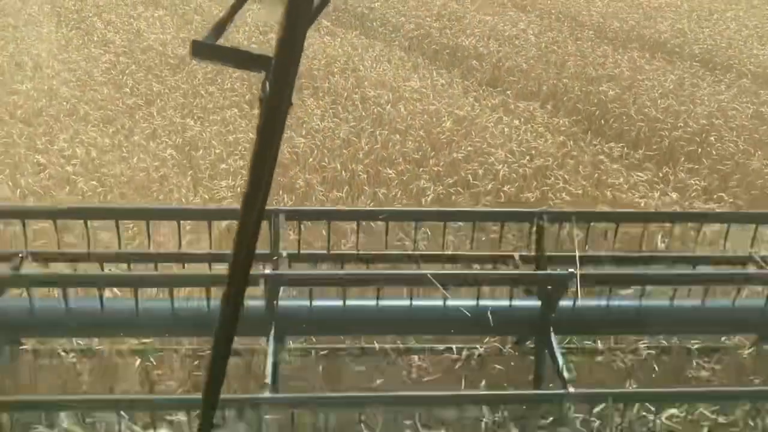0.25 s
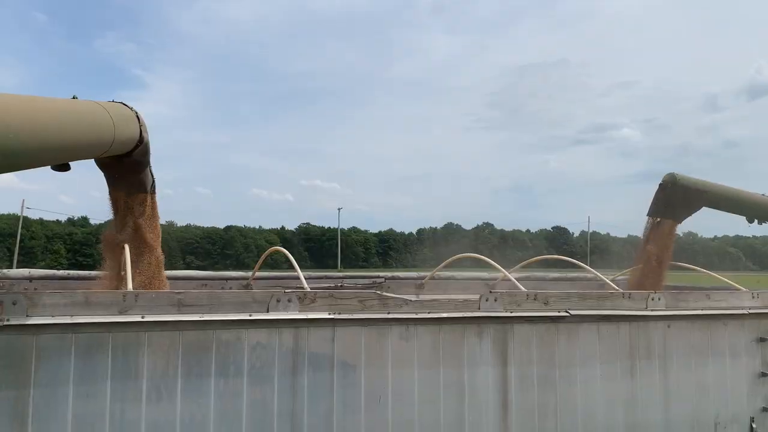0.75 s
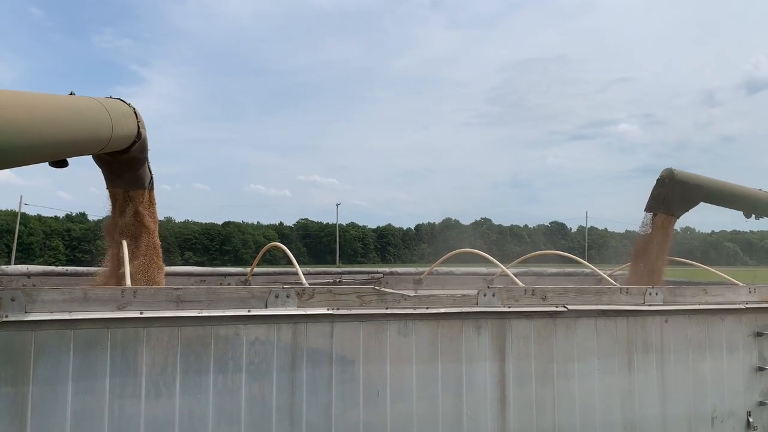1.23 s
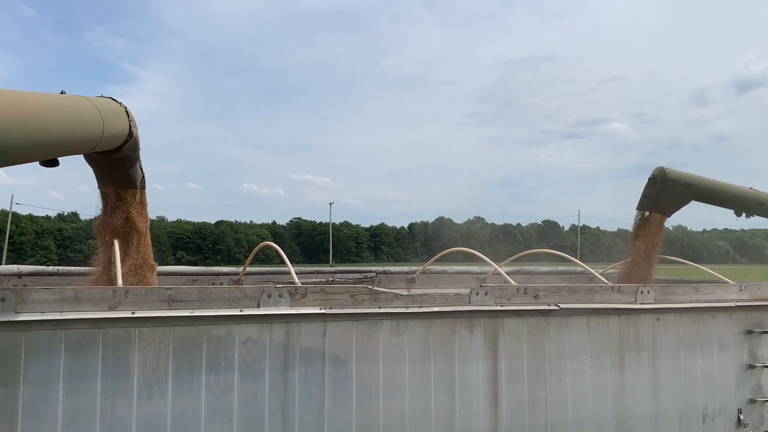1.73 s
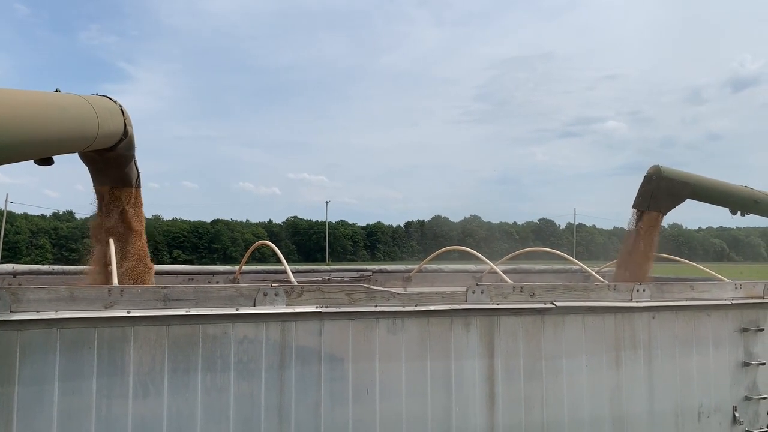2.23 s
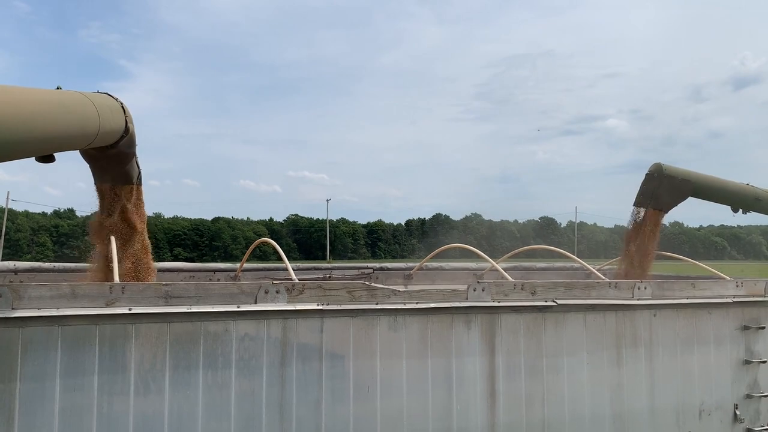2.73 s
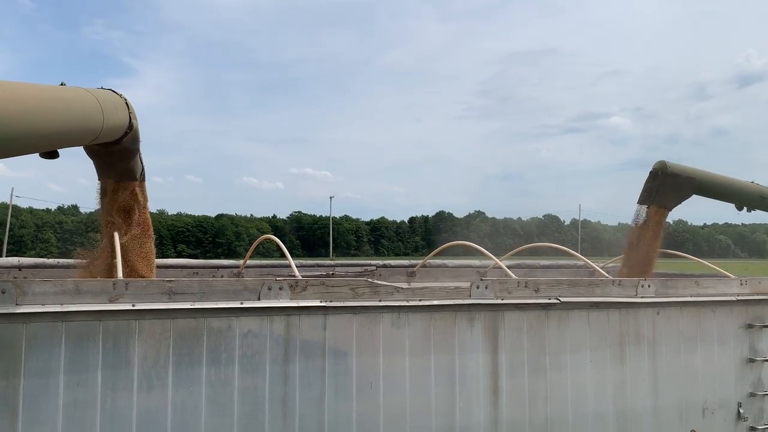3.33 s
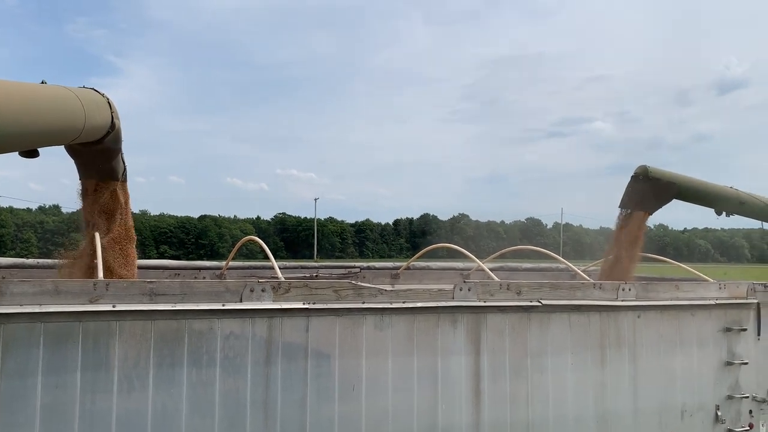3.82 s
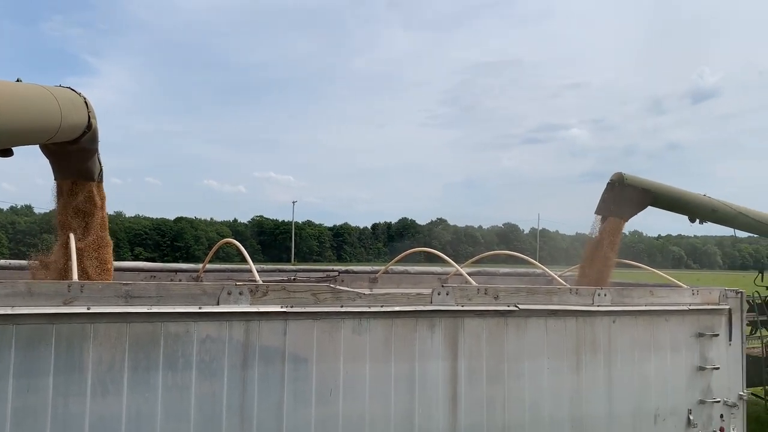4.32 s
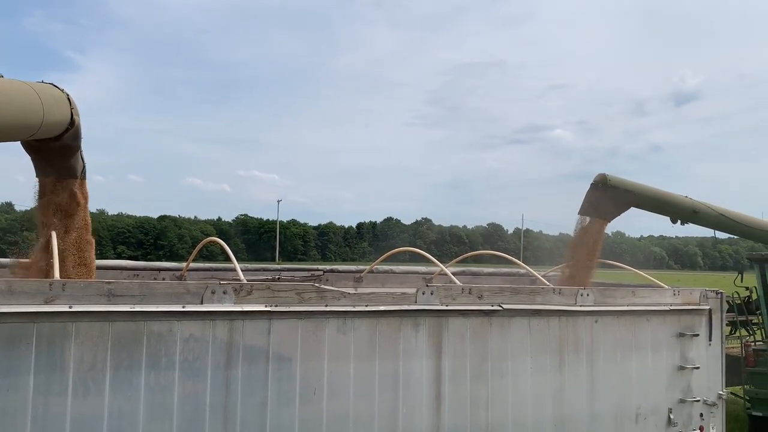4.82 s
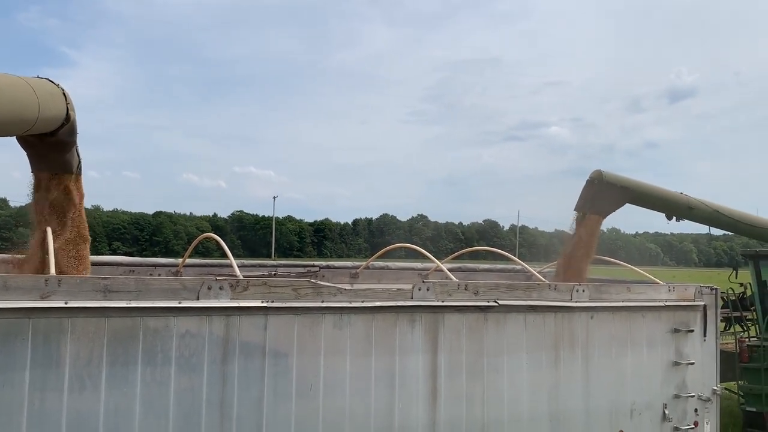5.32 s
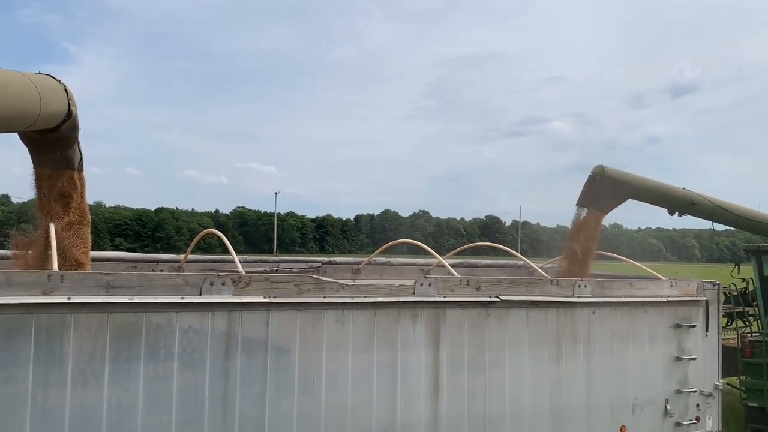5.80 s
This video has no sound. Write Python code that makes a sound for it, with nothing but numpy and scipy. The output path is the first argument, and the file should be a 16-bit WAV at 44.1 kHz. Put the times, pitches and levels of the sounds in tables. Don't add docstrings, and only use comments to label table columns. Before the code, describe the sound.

Muffled low cab rumble over ruts for half a second, then abruptly a loud whining, throbbing auger pouring hissing grain beside humming harvester engines.

```python
import sys
import numpy as np
from scipy import signal
from scipy.fft import rfft, irfft
from scipy.io import wavfile
from scipy.ndimage import map_coordinates

SR = 44100
rng = np.random.default_rng(int(sys.argv[2]) if len(sys.argv) > 2 else 0)


def waveform_to_disk(signal):
    frames = np.transpose(np.atleast_2d(signal))
    scaled = np.clip(frames, -1, 1) * 32767
    samples = np.round(scaled).astype(np.int16)
    wavfile.write(sys.argv[1], SR, samples)


def natural_amplitude(level_db):
    exponent = np.asarray(level_db, float) / 20
    return 10 ** exponent


N = 267025
TIME = np.arange(N) / SR
HZ = np.maximum(np.fft.rfftfreq(N, 1 / SR), 1)
CUT_S = 0.486
ROAR_LEAD_S, GRAIN_LEAD_S = 19.5 / SR, -13 / SR

# (frequency [Hz], density [dB per Hz])
CAB_RUMBLE = [(20, -63), (45, -42), (110, -39), (180, -49.5), (400, -57), (900, -64.5), (1500, -76.5)]
CAB_CLATTER = [(700, -6), (1200, 8.5), (2600, 8.5), (4000, -4.5), (7000, -11), (9500, -5), (11000, -6),
               (15000, -8)]
# (frequency [Hz], level [dB rms], left-right [dB])
CAB_TONES = [(113, -30.5, 4), (501, -40, -2), (509, -43, -1), (736, -41.5, 4), (858, -56, 10),
             (44, -30.5, 1), (277, -39, 2)]
# (time [s], peak [dB], frequency [Hz], 60 dB decay [s])
CAB_KNOCK = (.208, -38, 1100, .06)
# (time [s], rumble rise [dB])
JOLTS = [
    (.02, 1),
    (.06, 3.5),
    (.21, 4),
    (.31, 4.5),
    (.38, 2.5),
]
JOLT_S, CAB_RUMBLE_DB, CAB_CLATTER_DB = 0.0097, -2, -83.5

# (frequency [Hz], density [dB per Hz])
ROAR = [(22, -82), (40, -57), (62, -49.5), (105, -40), (145, -43.5), (200, -46), (310, -46), (500, -51),
        (1000, -55.5), (1600, -60.5), (2400, -63), (4000, -67), (6000, -69.5), (8000, -82)]
# (frequency [Hz], shared share [0-1])
ROAR_ALIKE = [(60, 0.85), (130, 0.93), (300, 0.64), (700, 0.32), (1000, 0.17), (1500, 0.63), (2500, 0),
              (5000, 0.51)]
# (frequency [Hz], left-right [dB])
ROAR_PAN = [(60, 3), (150, 2.5), (400, 6), (800, 2.5), (1300, 1), (3500, 1), (6000, -5)]
# (time [s], change [dB])
LOAD = [(.5, 0.2), (1.4, .2), (2.5, 0.2), (3.8, 0.35), (5.0, 0.27), (6.05, 0)]
LOW_FOLLOWS, GRAIN_FOLLOWS = 0.6, 0.7

# (frequency [Hz], level [dB rms], left-right [dB], phase wander [rad])
HUMS = [(71.3, -36, 1.6, .8), (187.05, -30.5, 1.5, .35), (240.5, -33, -3, 1.5), (305, -35, 3, 5.0),
        (559, -43, 3, 2.5), (794.7, -39, 3, .9), (930, -48, 5, 2.5), (1031.6, -45, -8, .8),
        (1082, -51, 14, .8), (1245, -49, 1, 4.0), (1284, -52, 1, 2.0)]
FIRING_HZ, FIRING_DB, FAR_FIRING_DB = 84.445, -22, -37
BEAT_HZ, BEAT_LEAD = 0.78, 0.31

# (frequency [Hz], density [dB per Hz])
GRAIN = [(3000, -77), (5500, -70), (7000, -71.5), (8400, -73.5), (9450, -72), (9750, -67), (10000, -68.5),
         (10500, -71), (11300, -69), (12500, -70), (12800, -65), (14100, -68), (14400, -72.5), (15200, -67)]
# (frequency [Hz], shared share [0-1])
GRAIN_ALIKE = [(5000, .4), (7000, .45), (8000, .9), (8400, .97), (9400, .92), (9900, .5), (10500, .2),
               (11700, .6), (15000, .3)]

# (rate [turns/s], angle at time zero [turns])
AUGERS = [(6.0444, .495), (6.49, -.027)]
# (rate [turns/s], angle at time zero [turns])
IDLERS = [(3.7, -.16), (4.16, .09)]
IDLER_DB, PRESS_CHANCE_DB = 1.3, 0.5
# (frequency [Hz], width [Hz], level [dB])
TUBE = [(1290, 65, -4), (1816, 45, -6), (1960, 33, -7.5), (2380, 17.5, -1.5), (2473, 43, -4.5),
        (2630, 54, -4), (4220, 64, -4)]
# (time [s], extra force [dB])
BINDS = [(.94, 4), (1.67, 7.5), (1.9, 4), (2.18, 11), (3.05, 3), (3.37, 4), (3.85, 7), (4.04, 7.5),
         (4.33, 4), (4.58, 8), (5.21, 6), (5.38, 3), (5.71, 1), (6.02, 3)]
BIND_S, PATCH_DB = 0.03, 2.5

TEETH = 23
GEARS = [(0, 1, .475, .33, .155, .68, .065), (0, 2, -.44, .45, .135, .5, -.05),
         (0, 3, .405, .75, .22, .7, .43), (0, 10, 0, .5, 0, 1.2, 0), (1, 1, -.154, .1, 0, .1, 0)]
# (level [dB rms], left-right [dB])
WHINE = [(-19.5, 4.5), (-24.5, 5.5), (-31, 3), (-38, 0), (-25.5, 3)]
SLACK_HZ, SLACK_RAD, SLACK_LEAD = 3.78, 0.31, 0.37

# (upper edge [Hz], then share of time heard [0-1] in
TREBLE_HEARD = [(8270, 0, 1, 1, 1), (8950, 0, 1, 0, 1), (9350, .08, .8, 1, 1), (10300, .65, .85, .85, .94),
                (10650, 1, 0, .84, .85), (11180, 1, .1, .36, .25), (11560, .1, .2, .3, .4),
                (11900, .05, .9, .25, .95), (12060, 1, .7, 1, 1), (12750, .85, 0, 1, .24),
                (13070, .97, .42, 1, 0), (13750, .95, .2, 0, 0), (14200, 1, .1, 1, 0),
                (14920, 1, 0, 1, .25), (15100, 1, .9, 1, 1), (15330, .3, .4, 0, .95), (15560, .3, 0, 0, .4),
                (SR, 0, 0, 0, 0)]


def in_time(rows):
    s, *columns = np.transpose(rows)
    return [np.interp(TIME, s, column) for column in columns]


def at_hz(points):
    hz, value = np.transpose(points)
    return np.interp(np.log(HZ), np.log(hz), value)


def drift(rate):
    knots = rng.standard_normal(400)
    return map_coordinates(knots, [TIME * rate + 2], order=3)


def bumps(rows, width_s):
    return sum(db * np.exp(-((TIME - s) / width_s) ** 2 / 2) for s, db in rows)


def at_ports(mono, pan_db, lead_s):
    half = natural_amplitude(pan_db / 2) * np.exp(1j * np.pi * HZ * lead_s)
    return irfft(rfft(mono) * np.array([half, 1 / half]), N)


def wash(spectrum, alike, pan_db, lead_s, white):
    in_band = (HZ > 0.7 * spectrum[0][0]) * (HZ < 1.05 * spectrum[-1][0])
    colour = natural_amplitude(at_hz(spectrum)) * np.sqrt(SR / 2) * in_band
    share = np.clip(alike, 0, 1)
    direct = at_ports(irfft(rfft(white[0]) * colour * np.sqrt(share), N), pan_db, lead_s)
    sides = natural_amplitude(np.outer([0.5, -0.5], np.ones(len(HZ))) * pan_db)
    scattered = irfft(rfft(white[1:]) * colour * np.sqrt(1 - share) * sides, N)
    return direct + scattered


def tone(hz, level_db, wander, flutter_db):
    phase = 2 * np.pi * (hz * TIME + rng.random()) + wander * drift(7)
    return np.sqrt(2) * natural_amplitude(level_db + flutter_db * drift(13)) * np.sin(phase)


def turns(auger):
    rate, start = AUGERS[auger]
    return 2 * np.pi * (rate * TIME + start)


def throb(first_db, second_db):
    return natural_amplitude(first_db * np.cos(turns(0)) + second_db * np.cos(turns(1)))


def idlers():
    return sum(np.cos(2 * np.pi * (rate * TIME + lead)) for rate, lead in IDLERS)


def knock():
    s, peak_db, hz, t60 = CAB_KNOCK
    age = np.maximum(TIME - s, 0)
    return natural_amplitude(peak_db - 60 * age / t60) * np.tanh(age / 0.004) * np.sin(2 * np.pi * hz * age)


def cab():
    rumble = wash(CAB_RUMBLE, at_hz(ROAR_ALIKE), 3.0, -12 / SR, rng.standard_normal((3, N)))
    clatter = wash(CAB_CLATTER, 0.22, 1.0, -12 / SR, rng.standard_normal((3, N)))
    tones = sum(at_ports(tone(hz, db, 0.43, flutter_db=1.4), pan_db, 0) for hz, db, pan_db in CAB_TONES)
    jolt_db = bumps(JOLTS, JOLT_S)
    rumble = rumble * natural_amplitude(CAB_RUMBLE_DB + jolt_db)
    clatter = clatter * natural_amplitude(CAB_CLATTER_DB + 0.21 * jolt_db)
    return rumble + clatter + tones + knock()


def roar(low_db, mid_db):
    noise = wash(ROAR, at_hz(ROAR_ALIKE), at_hz(ROAR_PAN), ROAR_LEAD_S, rng.standard_normal((3, N)))
    low = irfft(rfft(noise) / (1 + (HZ / 800) ** 4), N)
    mid = (noise - low) * throb(0.69, 0.36)
    return low * natural_amplitude(low_db + 0.32 * drift(11)) + mid * natural_amplitude(mid_db + 0.86 * drift(16))


def engines():
    angle = 2 * np.pi * FIRING_HZ * TIME + 0.2 * drift(7)
    near = natural_amplitude(FIRING_DB + 0.89 * drift(9)) * np.sin(angle)
    far = natural_amplitude(FAR_FIRING_DB) * np.sin(angle - 2 * np.pi * (BEAT_HZ * TIME + BEAT_LEAD))
    hums = sum(at_ports(tone(hz, db, wander, flutter_db=2.5), pan_db, 0.23 * ROAR_LEAD_S)
               for hz, db, pan_db, wander in HUMS)
    return at_ports(np.sqrt(2) * (near + far), 1.7, ROAR_LEAD_S) + hums


def grain(flow_db):
    hits = (rng.random((3, N)) < 16000 / SR) * rng.standard_normal((3, N))
    hiss = wash(GRAIN, at_hz(GRAIN_ALIKE), -0.25, GRAIN_LEAD_S, hits / hits.std())
    return hiss * natural_amplitude(flow_db + 0.5 * drift(12)) * throb(0.41, 0.24)


def scraping(level_db):
    out = np.zeros(N)
    press_db = IDLER_DB * idlers() + bumps(BINDS, BIND_S) + PRESS_CHANCE_DB * drift(15)
    force = natural_amplitude(level_db + press_db) * throb(3.5, 2.6)
    for hz, width, mode_db in TUBE:
        born = rng.random(N) < 1500 / SR
        patch = force * natural_amplitude(PATCH_DB * drift(12))
        strength = natural_amplitude(2.5 * np.minimum(rng.exponential(1, N), 3))
        knocks = born * patch * strength * rng.choice([-1, 1], N)
        r = np.exp(-np.pi * width / SR)
        poles = [1, -2 * r * np.cos(2 * np.pi * hz / SR), r * r]
        out += natural_amplitude(mode_db) * signal.lfilter([0.5, 0, -0.5], poles, knocks + 1e-18)
    return at_ports(out, 1.0, ROAR_LEAD_S)


def gears():
    out = 0
    slack = SLACK_RAD * np.cos(2 * np.pi * (SLACK_HZ * TIME + SLACK_LEAD)) + 0.14 * drift(8)
    tug = 0.2 * np.cos(turns(1) + 0.86)
    for gear, (level_db, pan_db) in zip(GEARS, WHINE):
        auger, multiple, offset, depth, lead, wobble, wobble_lead = gear
        first = 1 - auger
        angle = turns(auger)
        phase = TEETH * multiple * angle + 2 * np.pi * offset
        phase = phase + wobble * np.cos(angle + 2 * np.pi * wobble_lead)
        phase = phase + slack * min(multiple, 4) * first
        swell = 1 + depth * np.cos(angle + 2 * np.pi * lead) + tug * first
        whine = swell * natural_amplitude(level_db + 1.2 * drift(18)) * np.sqrt(2) * np.cos(phase)
        out = out + at_ports(whine, pan_db, 0.62 * ROAR_LEAD_S)
    return out


def scene():
    load_db, = in_time(LOAD)
    machines = roar(LOW_FOLLOWS * load_db, load_db + 0.27 * idlers()) + engines() + gears()
    yard = machines + grain(GRAIN_FOLLOWS * load_db) + scraping(level_db=-56.5)
    return np.where(TIME < CUT_S, cab(), yard)


def thin_treble(x):
    hz, s, frames = signal.stft([x[0] + x[1], x[0] - x[1]], SR, "cosine", nperseg=2048)
    at = np.minimum(s * SR, N - 1).astype(int)
    edges = [7580] + [row[0] for row in TREBLE_HEARD]
    common = drift(13)[at]
    at_change = abs(s - CUT_S - 0.012) < 0.012
    for low, (high, *shares) in zip(edges, TREBLE_HEARD):
        for ch in (0, 1):
            chance = 0.6 * common + drift(20 + 8 * ch)[at]
            rank = np.argsort(np.argsort(chance)) / len(s)
            heard = rank < np.where(s < CUT_S, shares[ch], shares[2 + ch])
            frames[ch, (hz >= low) & (hz < high)] *= heard | at_change
    frames[:, hz > 15900] = 0
    total, difference = signal.istft(frames, SR, "cosine", nperseg=2048)[1][:, :N]
    return np.array([total + difference, total - difference]) / 2


def band_limit(x):
    return signal.sosfilt(signal.butter(12, 16180, fs=SR, output="sos"), x)


def record(dry):
    rounded = 1.252 * np.tanh(dry / 1.355)
    mix = thin_treble(rounded)
    return band_limit(mix)


dry = scene()
out = record(dry)
waveform_to_disk(out)
```